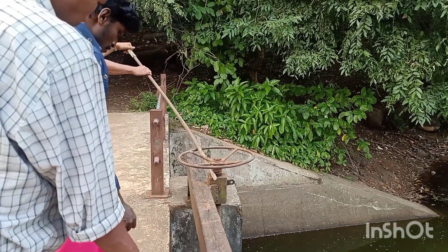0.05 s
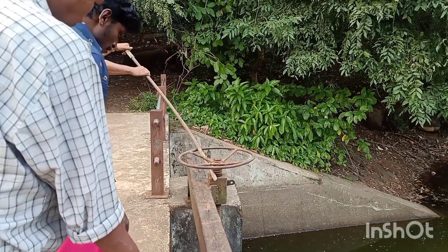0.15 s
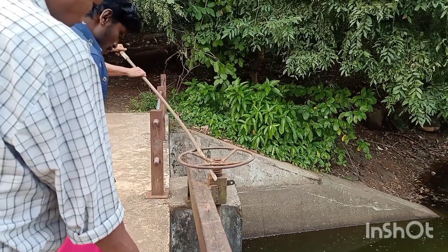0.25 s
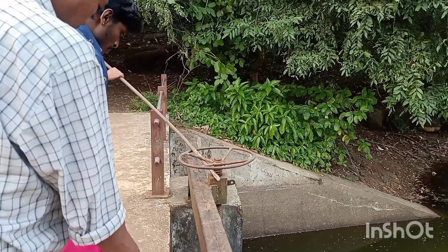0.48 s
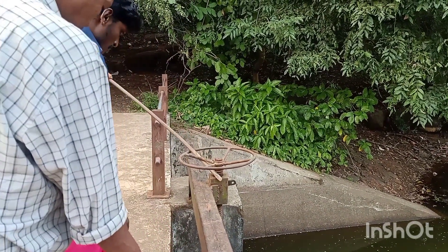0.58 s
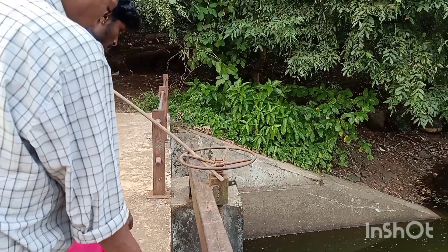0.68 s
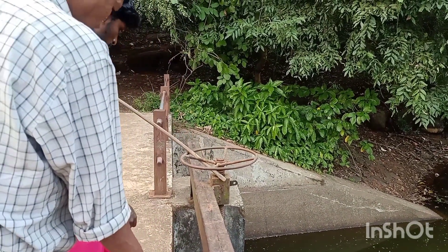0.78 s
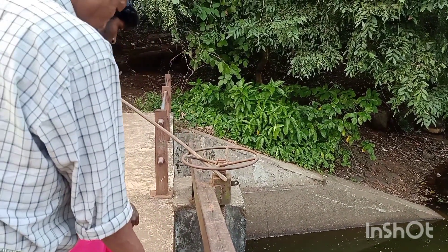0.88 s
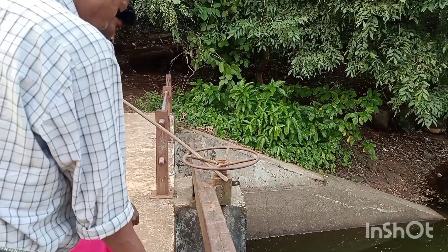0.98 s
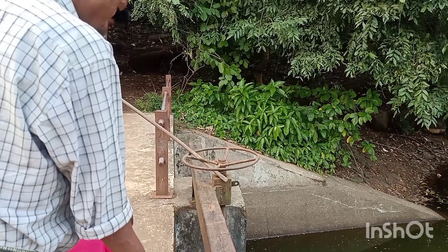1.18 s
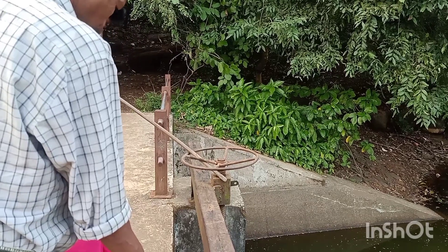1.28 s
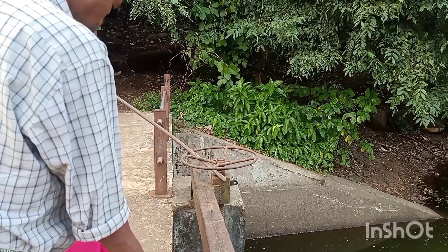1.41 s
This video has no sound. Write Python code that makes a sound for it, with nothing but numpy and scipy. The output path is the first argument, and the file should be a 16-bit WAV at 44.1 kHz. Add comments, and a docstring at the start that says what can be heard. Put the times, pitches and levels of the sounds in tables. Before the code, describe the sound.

A rusty handwheel on a steel gate jerks round with clustered clanks, rattles and short rings over low booms, then a bar scrapes along the rim; faint hiss and birds outdoors, close phone microphone.

```python
"""Outdoors, a rusty handwheel above a steel gate is levered round with an iron bar, over a soft hiss.
The spindle sticks and gives way in jerks: bursts of random slips rattle the frame, and decaying sine
tones ring the wheel, spokes and gate. The gate sways, and its deep tones wax and wane.
Then the bar drags along the rim as gritty noise with two scuffs.
A far bird calls near one note and a higher one chirps once, as sines; water and insects are shaped noise."""
import sys
import numpy as np
from scipy import signal
from scipy.fft import rfft, irfft, next_fast_len
from scipy.io import wavfile
from scipy.ndimage import map_coordinates

SR = 44100
rng = np.random.default_rng(int(sys.argv[2]) if len(sys.argv) > 2 else 0)


def to_wav(sig):
    """Store sig (one row per channel, or 1-D mono) as 16-bit WAV at the path in sys.argv[1].

    Samples outside -1..1 are clipped; the rate is SR.
    """
    pcm = np.clip(np.atleast_2d(sig), -1, 1) * 32767
    pcm = np.round(pcm).astype(np.int16)
    wavfile.write(sys.argv[1], SR, pcm.T)  # frames by channels


N = 63945
T = np.arange(N) / SR  # time, s
SIDES = np.array([[0.5], [-0.5]])  # left, right


def amp(db):
    """Turn decibels into a gain."""
    return 10 ** (np.asarray(db) / 20)


def unit(x):
    """Scale to an average (rms) level of 1."""
    return x / np.sqrt(np.mean(x ** 2) + 1e-20)


def along(points, hz):
    """Read a curve of (pitch, value) points, spacing the pitches as the ear does (log scale)."""
    f, value = np.transpose(points)
    return np.interp(np.log(hz + 1), np.log(f + 1), value)


def wobble(rate):
    """A smooth random curve with `rate` random points a second."""
    knots = rng.standard_normal(int(N * rate / SR) + 4)
    return map_coordinates(knots, [T * rate])


def filtered(x, response):
    """Change the strength and timing of each frequency by a response curve."""
    size = next_fast_len(N + SR)
    hz = np.fft.rfftfreq(size, 1 / SR)
    return irfft(rfft(x, size) * response(hz), size)[..., :N]


def placed(x, lag_s, left_db):
    """Put a source off centre: the left side differs from the right in level and delay."""
    return filtered(x, lambda hz: amp(left_db * SIDES) * np.exp(-2j * np.pi * hz * lag_s * SIDES))


# How alike left and right are in wide noise: pitch_hz, likeness (0 to 1)
ALIKE = [(100, 0.93), (1000, 0.46), (3000, 0.067), (8000, 0.033)]


def rush(colour):
    """Steady stereo noise with a given colour: low sounds reach both sides alike, high ones differ."""
    def mid_and_side(hz):
        turn = np.arccos(np.clip(along(ALIKE, hz), 0, 1)) / 2
        return amp(along(colour, hz)) * [np.cos(turn), np.sin(turn)]

    mid, side = filtered(rng.standard_normal((2, N)), mid_and_side)
    return unit(np.array([mid + side, mid - side]))


# Colour of the water and insects: pitch_hz, relative level_db per Hz
AIR_COLOUR = [(18, -50.5), (30, -16), (113, -2.5), (190, -9), (497, -14.5), (662, -10.5), (859, -7),
              (1140, -6.5), (1920, -11.5), (2190, -2.5), (2630, -4), (4200, -18), (6530, -9), (8250, -32),
              (9640, -26.5), (10400, -39.5), (15000, -36)]
AIR_DB, AIR_SWAY_DB = -66.5, 0.7  # level before the stereo balance; depth of each sway


def air():
    """Far water and insects: many tiny sounds blend into a gently swaying hiss."""
    sway_db = AIR_SWAY_DB * (wobble(8.3) + wobble(30))
    return amp(AIR_DB + sway_db) * rush(AIR_COLOUR)


# The gate's three lowest tones: pitch_hz
BOOM_HZ = [145, 91, 182]
# How far each pitch wavers: waver_hz
BOOM_WAVER_HZ = [3.8, 6.9, 4.1]
# The gate sways, and its deep tones wax and wane: time_s, relative level_db of each of the three tones
BOOM_LEVELS = [(0.0, -71, -74, -98), (0.032, -69.5, -71.5, -90), (0.194, -87.5, -93, -93),
               (0.242, -67, -75, -77), (0.278, -51.5, -58.5, -73), (0.332, -54.5, -58, -54.5),
               (0.39, -56.5, -78, -64), (0.42, -52, -71, -60.5), (0.484, -68, -68, -68),
               (0.532, -53, -61, -71), (0.626, -51, -54.5, -72), (0.654, -67.5, -47, -63),
               (0.68, -54, -53, -57), (0.716, -50.5, -69, -66), (0.752, -40.5, -67, -68),
               (0.792, -46, -50.5, -66), (0.832, -78, -62, -67), (0.864, -51.5, -68, -64),
               (0.916, -53, -58, -65), (0.976, -59.5, -71, -78), (1.176, -72, -80, -79),
               (1.3, -91, -87, -100)]


def boom():
    """The gate's deepest modes: large steel moves slowly, giving low tones that come and go."""
    time_s, *levels = np.transpose(BOOM_LEVELS)
    total = 0
    for hz, level_db, waver_hz in zip(BOOM_HZ, levels, BOOM_WAVER_HZ):
        cycles = np.cumsum(hz + waver_hz * wobble(25)) / SR
        loudness = amp(np.interp(T, time_s, level_db, 0, -120) + 4.5)
        total = total + loudness * np.sin(2 * np.pi * cycles)
    return total


# Far bird's notes: start_s, length_s (before the fade-out), pitch_hz (before waver), relative level_db
BIRD_NOTES = [(0.352, 0.021, 1180, -62.5), (0.439, .05, 1182, -65.5), (0.924, 0.022, 1137, -65),
              (0.96, .022, 1140, -59.5), (1.014, 0.017, 1178, -56.5), (1.049, 0.039, 1200, -60),
              (1.17, 0.0091, 1163, -61), (1.265, 0.042, 1202, -63.5), (1.315, .012, 1184, -62),
              (1.33, 0.02, 1190, -73), (1.372, 0.012, 1234, -73), (1.395, 0.022, 1180, -62.5),
              (1.428, .03, 1200, -61)]
# One note of a second, higher bird: same columns
CHIRP = (.032, .022, 2500, -62)
BIRD_EDGE_S, BIRD_WAVER_HZ = 0.008, 23.95  # fade in and out; size of pitch waver
BIRD_LAG_S, BIRD_LEFT_DB = 0.00027, 8.6  # later and louder on the left


def bird():
    """Two birds: each short note is a nearly pure tone, unsteady in pitch and level."""
    calls, waver_hz = np.zeros(N), BIRD_WAVER_HZ * wobble(120)
    for start, length, hz, level_db in BIRD_NOTES + [CHIRP]:
        time_to_edge = np.minimum(T - start, start + length + BIRD_EDGE_S - T)
        shape = np.clip(time_to_edge / BIRD_EDGE_S, 0, 1)
        cycles = np.cumsum(hz + waver_hz) / SR
        calls += amp(level_db + 2.5) * shape * np.sin(2 * np.pi * cycles)
    return placed(calls * amp(2.5 * wobble(90)), BIRD_LAG_S, BIRD_LEFT_DB)


SLIPS_PER_S, SLIP_SPREAD_DB, FADE_S = 1500, 6, 0.0014  # FADE_S is the shortest fade


def slips(start, length, hold_share):
    """Rusty metal lets go in random clicks, strong for a share of the jerk, then fading; energy 1."""
    u = (T - start) / length
    onset = np.clip(0.9 + u / hold_share, 0, 1) * (u >= 0)
    past_hold_s = np.clip(u - hold_share, 0, None) * length
    fade = np.exp(-(past_hold_s / (FADE_S + length * (1 - hold_share))) ** 2)
    clicks = (rng.random(N) < SLIPS_PER_S / SR) * rng.choice([-1, 1], N)
    x = onset * fade * clicks * amp(SLIP_SPREAD_DB * rng.standard_normal(N))
    return x / np.linalg.norm(x)


def tail(colour, t60, alike):
    """Dying stereo noise of energy about 1 a side: many modes too close to tell apart."""
    hz, t, z = signal.stft(rng.standard_normal((2, SR // 2)), SR, nperseg=256)
    z = z * amp(along(colour, hz)[:, None] - 60 * t / along(t60, hz)[:, None])
    a, b = signal.istft(z, SR, nperseg=256)[1]
    turn = np.arccos(np.clip(alike, 0, 1)) / 2
    mid, side = np.cos(turn) * a, np.sin(turn) * b
    return np.array([mid + side, mid - side]) / np.linalg.norm(a)


def shaken(force, dying_noise):
    """Let every slip set off its own dying noise, and add them up."""
    return signal.fftconvolve(force[None], dying_noise, axes=1)[:, :N]


SWELL_POWER = 0.66  # how much longer low modes take to swell
FOCUS_DB, FOCUS_MAX_DB = 25.5, 12  # loss per octave squared away from the loudest pitch; greatest loss
GRIP_T60 = 0.05  # s to fall 60 dB while the spindle sticks again and damps most of the ring
MODE_SPREAD_DB, WIDE_RAD_PER_KHZ = 1.5, 0.66  # scatter of mode levels; left-right phase scatter


def ring(modes, start, length, free_db, focus_hz=None):
    """Metal modes swell while the spindle slips, low ones last, then die fast with a longer ring beneath."""
    t, total = np.clip(T - start, 0, None), 0
    scatter = rng.standard_normal((len(modes), 3))
    for (hz, level_db, t60), (louder, phase, apart) in zip(modes, scatter):
        off_db = min(FOCUS_DB * np.log2(hz / focus_hz) ** 2, FOCUS_MAX_DB) if focus_hz else 0
        swell_s = length * (1000 / hz) ** SWELL_POWER
        after = np.clip(t - swell_s, 0, None)
        gripped, free = amp(-60 * after / GRIP_T60), amp(free_db - 60 * after / t60)
        shape = np.clip(t / swell_s, 0, 1) ** 2.76 * (gripped + free)
        side_phase = WIDE_RAD_PER_KHZ * hz / 1000 * apart * SIDES
        tone = np.sin(2 * np.pi * hz * t + 3 * phase + side_phase)
        total = total + shape * amp(level_db - off_db + MODE_SPREAD_DB * louder) * tone
    return total


# Modes of wheel, spokes and gate: pitch_hz, relative level_db, t60_s (free ring falls 60 dB)
WHEEL = [(528.2, 0.5, 0.35), (695.4, -5.5, 0.13), (803, -11, 0.4), (928, 0, 0.3), (1109, -6.5, .3),
         (1173, -12.5, 0.46), (1300, -8.5, 0.1), (1304, -4, 0.26), (1430, -10.5, 0.86), (1547, -3, 0.24),
         (1580, -8.5, 0.24)]
SPOKES = [(2060, -11.5, 0.24), (2283, -8, 0.32), (2513, -1.5, 0.067), (2592, -7.5, 0.3), (2590, -9, 0.077),
          (2926, -5, .2), (3048, -9, 0.073), (3347, -11, 0.04)]
GATE = [(236.8, -13.5, 0.53), (277.2, -8.5, 0.5), (327, -4.5, 0.5), (371.6, -9, 0.44), (436, -14, 0.31)]


def ringing_metal(start, length, loudest_hz, bright_db, gate_db, free_db):
    """One jerk rings the wheel most near one pitch, plus its bright spokes and the gate below."""
    wheel = ring(WHEEL, start, length, free_db, loudest_hz)
    spokes = amp(bright_db) * ring(SPOKES, start, length, free_db)
    gate = amp(gate_db) * ring(GATE, start, length / 2, free_db)
    return wheel + spokes + gate


# Colour of the frame's dense small modes: pitch_hz, relative level_db per Hz
CLATTER = [(88, -30), (150, 2.5), (178, -17), (418, -37), (517, -6.5), (650, -11.5), (927, -2.5),
           (2000, -6), (2480, -4), (4500, -26.5), (5850, -67.5), (9900, -120)]
# How long they last: pitch_hz, t60_s
CLATTER_T60 = [(200, 0.79), (1000, 0.32), (3000, 0.29), (8000, 0.063)]


def frame_clatter(force, bright_db):
    """Slips rattle the frame; bright_db raises or lowers its sound above 1900 Hz."""
    colour = [(hz, level_db + bright_db * (hz > 1900)) for hz, level_db in CLATTER]
    return shaken(force, tail(colour, CLATTER_T60, alike=0.88))


# Colour of the treble crack: pitch_hz, relative level_db per Hz
CRACK = [(2000, -120), (3500, 0.5), (4300, -9.5), (6400, 2), (7000, 0.5), (8500, -19.5), (10000, -22.5),
         (11500, -16.5), (13700, -16), (15200, -32)]
# How long the crack itself lasts: pitch_hz, t60_s
CRACK_T60 = [(5000, 0.098), (13000, 0.042)]
# How long the softer treble tail beneath it lasts: pitch_hz, t60_s
LONG_TAIL_T60 = [(5000, 0.72), (13000, .4)]
LONG_TAIL_DB, DULL_HZ = -6.5, 7620  # long tail against crack; the crack's top lies above DULL_HZ


def treble_crack(force, top_db):
    """Sharp slips crack in the treble; a softer, longer, wider tail dies away beneath the crack."""
    short = tail(CRACK, CRACK_T60, alike=0.34)
    long = amp(LONG_TAIL_DB) * tail(CRACK, LONG_TAIL_T60, alike=0.18)
    return filtered(shaken(force, short + long), lambda hz: amp(top_db / (1 + (DULL_HZ / (hz + 1)) ** 10)))


# Jerks of the spindle: start_s, slip_length_s, level_db (of the wheel, before scatter and placing),
# loudest_hz, then relative levels: bright_modes_db, crack_db, crack_top_db, gate_db, clatter_db, ring_on_db
JERKS = [(0.172, 0.031, -70, 890, -20, -39, -15, -20, -11, 1.5),
         (0.232, 0.015, -43, 648, -16.5, -50, -15, 0.5, -3, -2.5),
         (0.254, 0.013, -40, 1080, -13.5, -48.5, -17.5, 0, -15, -9),
         (0.479, 0.0062, -42, 1443, -8, -49, -19, -11, -4.5, -7.5),
         (0.485, 0.0067, -41, 540, -7, -49, -21, -14, -5.5, -2),
         (.508, 0.015, -43, 1210, -6, -43, -22, -7.5, -7.5, -6),
         (0.539, 0.0064, -40, 1500, -6, -28, -23, -10, -5, -8.5),
         (0.544, 0.0049, -34.5, 673, -15, -50, -25, -15, -10, -6),
         (0.569, 0.0039, -49, 900, -4, -42, -25, -41, 3, 0.5),
         (0.591, 0.014, -35, 996, -6.5, -32.5, -6, -8, -5, -4),
         (0.655, 0.0094, -36.5, 1004, 6, -13.5, -11, -10.5, -12, -5),
         (0.68, 0.0078, -43, 950, 3, -18.5, -33, -40, -4, -6.5),
         (0.708, 0.0019, -33.5, 1600, 0, -25, -32.5, -11, -5, -6.5),
         (.716, 0.014, -35, 950, -8, -45.5, -20, -10, -9.5, -2),
         (0.804, 0.014, -44, 1200, 12.5, -7, 2.5, -10, 2, -3.5),
         (0.912, 0.0046, -64, 1170, -4, -7.5, -1.5, 11, -0.5, -21.5)]
RATTLE_DB, SHAKE_DB = 35, 1  # slips over the modes; unsteadiness of the ring
SLIP_HOLD = 0.56  # share of each jerk before its slips fade
CLATTER_TOP_HZ = 3900  # ring, clatter and scuffs fall away above this
WHEEL_LAG_S, WHEEL_LEFT_DB = 0.00006, 1  # a little later and louder on the left


def handwheel():
    """Each time the stuck spindle gives way, it rings the metal, rattles the frame and cracks."""
    rung, clatter, cracks = np.zeros((3, 2, N))
    for (start, length, level_db, loudest_hz, bright_db,
         crack_db, top_db, gate_db, clatter_db, free_db) in JERKS:
        rung += amp(level_db) * ringing_metal(start, length, loudest_hz, bright_db, gate_db, free_db)
        force = amp(level_db + RATTLE_DB) * slips(start, length, SLIP_HOLD)
        clatter += amp(clatter_db) * frame_clatter(force, bright_db)
        cracks += amp(crack_db) * treble_crack(force, top_db)
    body = rung * amp(SHAKE_DB * wobble(150)) + clatter + scuffs()
    body = filtered(body, lambda hz: 1 / (1 + (hz / CLATTER_TOP_HZ) ** 8))
    return placed(body + cracks, WHEEL_LAG_S, WHEEL_LEFT_DB)


# Loudness of the dragging bar: time_s, level_db (before the stereo balance)
DRAG_LEVEL = [(.88, -56), (0.932, -60.5), (1.0, -61.5), (1.032, -56), (1.09, -55.5), (1.18, -57.5),
              (1.211, -62), (1.25, -71.5), (1.3, -82)]
# Colour of the dragging bar: pitch_hz, relative level_db per Hz
DRAG_COLOUR = [(120, -13.5), (200, -6), (344, -9), (390, -4), (570, -16), (1430, -8.5), (3290, -2.5),
               (4090, -16), (6420, -6.5), (7970, -30), (15000, -44)]
GRIT_DB = 2.5  # size of the fast roughness


def drag():
    """The bar rubs along the rusty rim: noise made gritty by fast, uneven loudness."""
    time_s, level_db = np.transpose(DRAG_LEVEL)
    grit = amp(GRIT_DB * wobble(400) + 1.6 * wobble(40.53))
    loudness = amp(np.interp(T, time_s, level_db, -120, -120))
    return loudness * unit(grit * rush(DRAG_COLOUR))


# Catches of the bar on the rim: start_s, relative level_db
SCUFFS = [(1.028, -26.5), (1.163, -27)]
# Colour of a scuff: pitch_hz, relative level_db per Hz
SCUFF_COLOUR = [(600, -31), (1100, 0), (1600, -3.5), (2600, -21), (5000, -48)]
SCUFF_S = 0.011  # length of the slipping


def scuffs():
    """The bar catches on the rim: a short burst of slips sets off a quickly dying noise."""
    total = np.zeros((2, N))
    for start, level_db in SCUFFS:
        force = slips(start, SCUFF_S, 0.31)
        total += amp(level_db) * shaken(force, tail(SCUFF_COLOUR, [(1000, 0.078)], alike=0.63))
    return total


def scene():
    """Add all sources; the drag and the air lean to the left."""
    leaning = amp([[1.5], [-1.5]]) * (air() + drag())
    return leaning + boom() + bird() + handwheel()


BASS_CUT_HZ, TOP_HZ = 53, 15385


def record(dry):
    """The phone cuts the deep bass and keeps nothing from its top frequency upward."""
    return filtered(dry, lambda hz: (hz < TOP_HZ) * (1j * hz / (BASS_CUT_HZ + 1j * hz)) ** 2)


dry = scene()
out = record(dry)
to_wav(out)
```